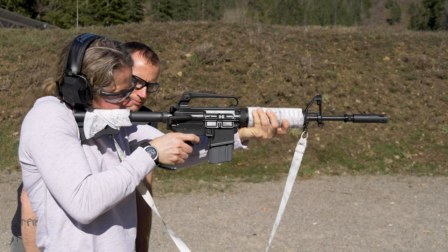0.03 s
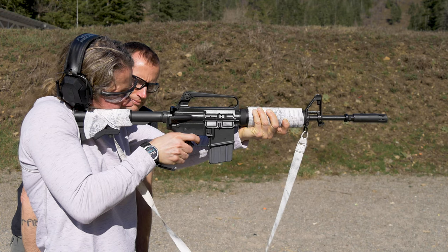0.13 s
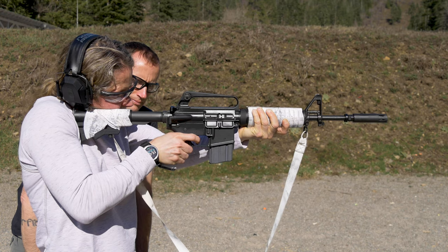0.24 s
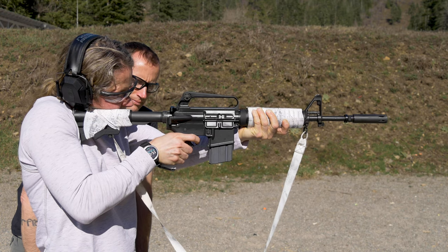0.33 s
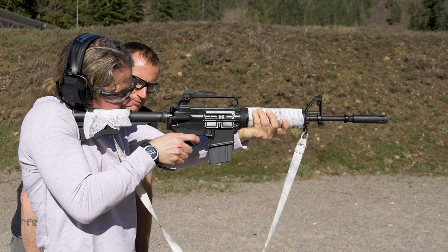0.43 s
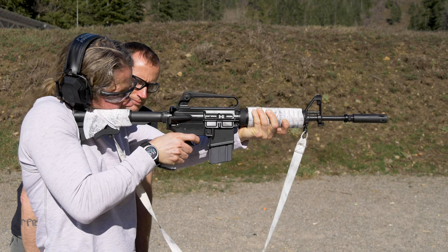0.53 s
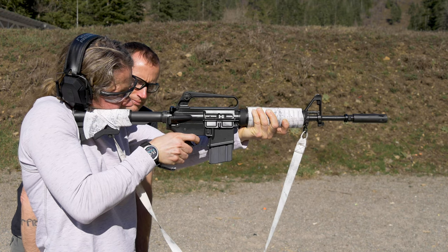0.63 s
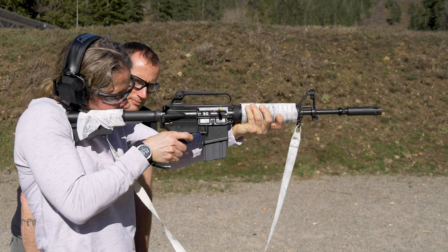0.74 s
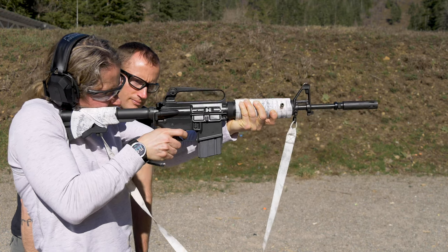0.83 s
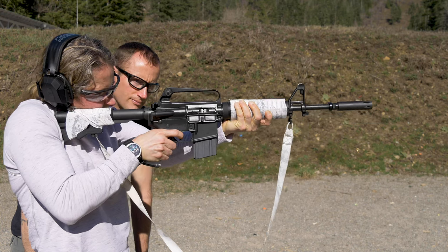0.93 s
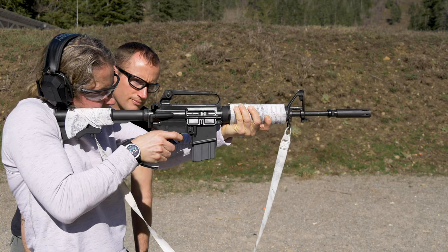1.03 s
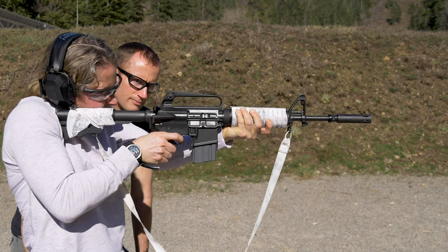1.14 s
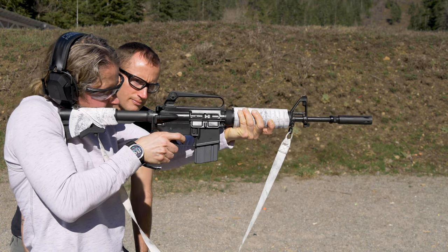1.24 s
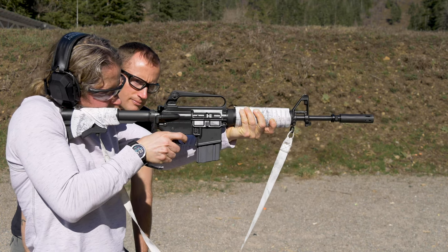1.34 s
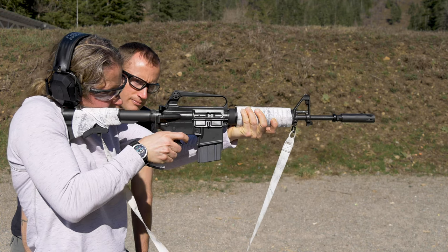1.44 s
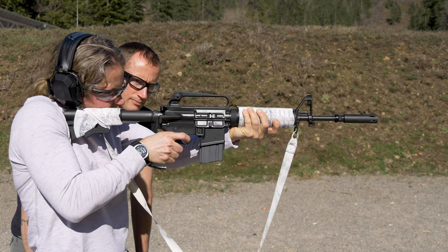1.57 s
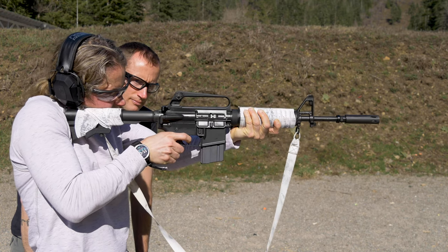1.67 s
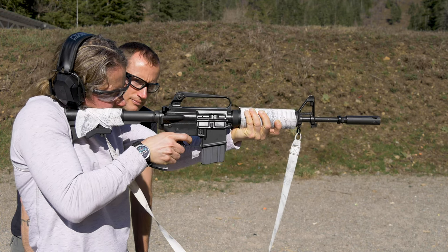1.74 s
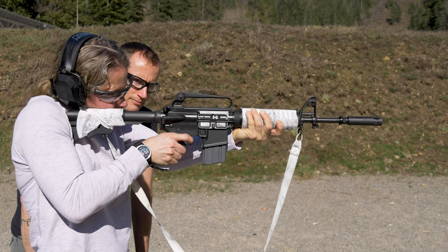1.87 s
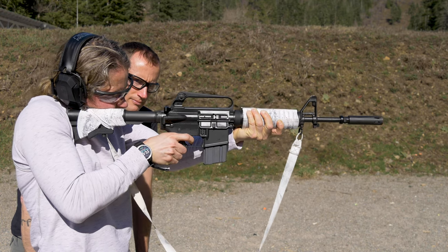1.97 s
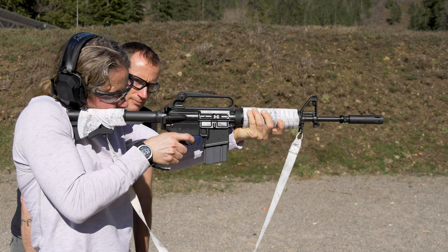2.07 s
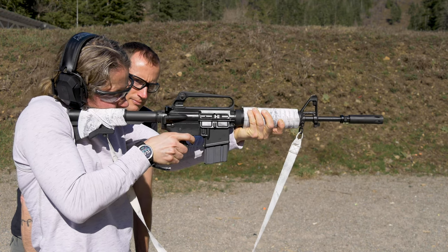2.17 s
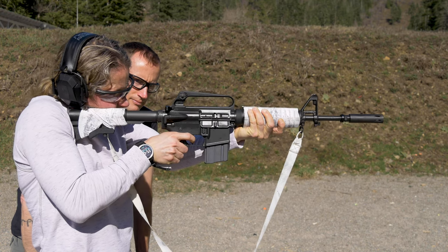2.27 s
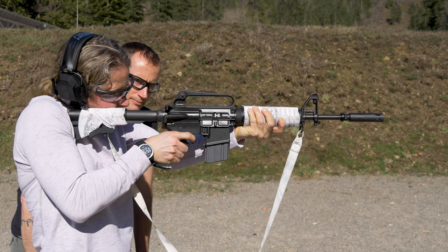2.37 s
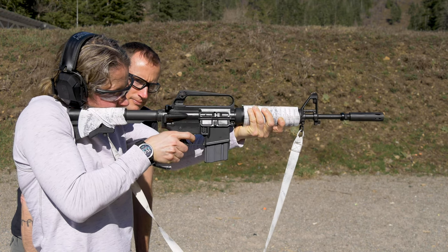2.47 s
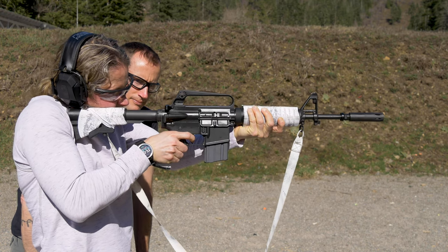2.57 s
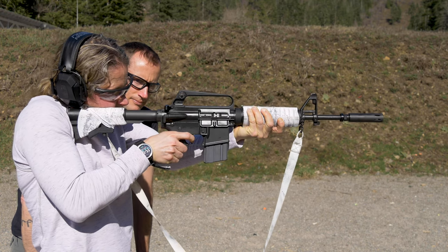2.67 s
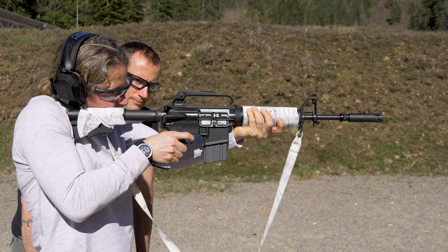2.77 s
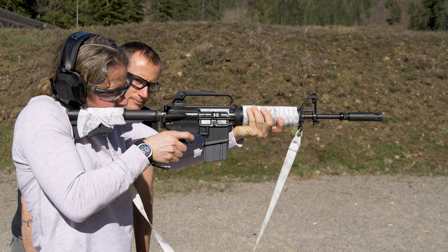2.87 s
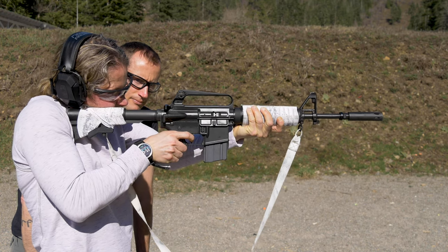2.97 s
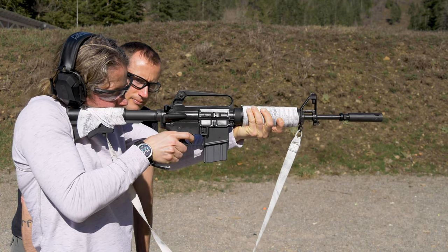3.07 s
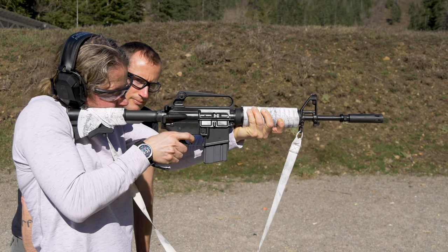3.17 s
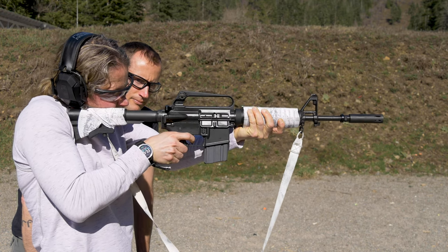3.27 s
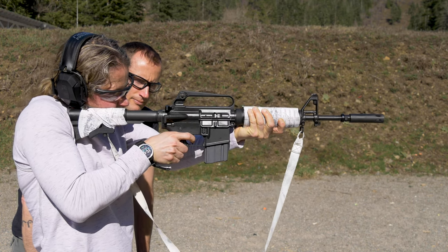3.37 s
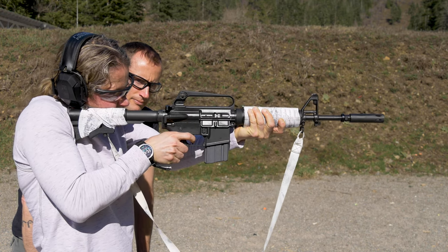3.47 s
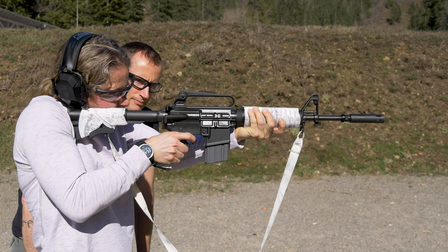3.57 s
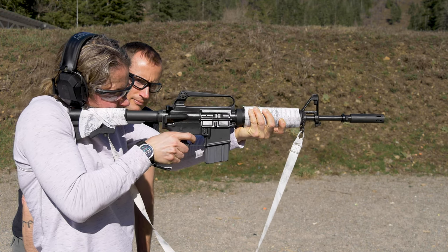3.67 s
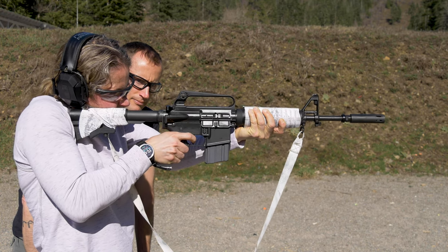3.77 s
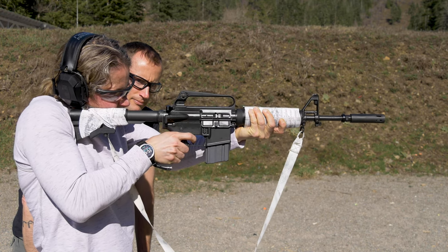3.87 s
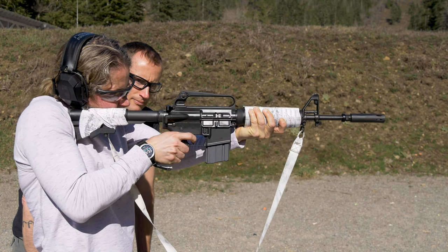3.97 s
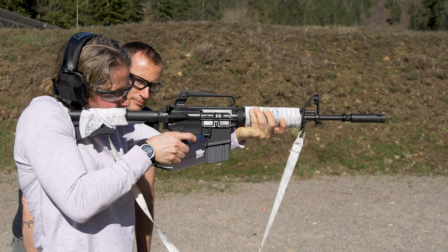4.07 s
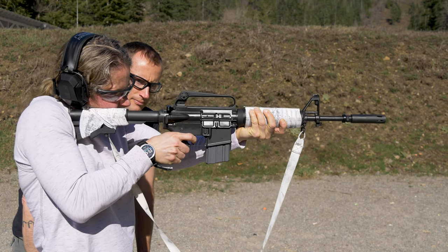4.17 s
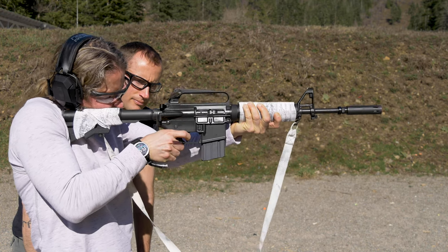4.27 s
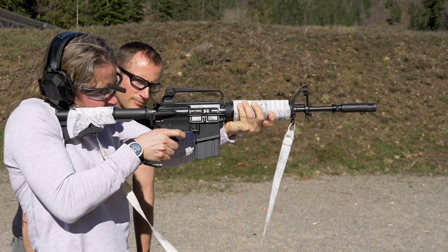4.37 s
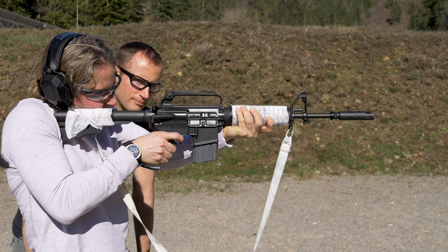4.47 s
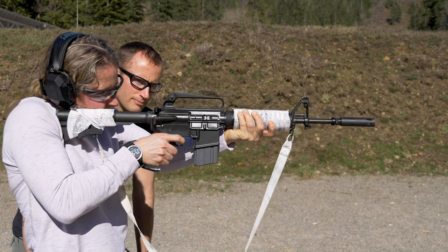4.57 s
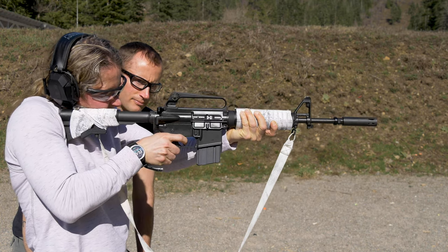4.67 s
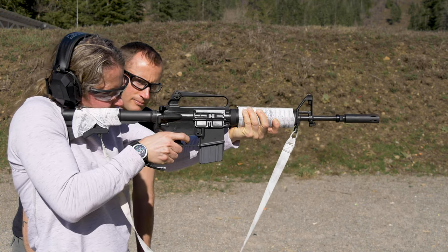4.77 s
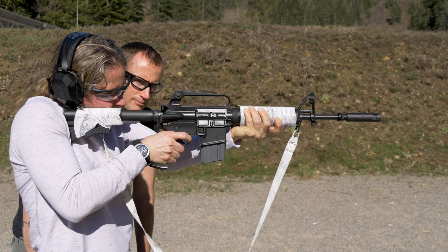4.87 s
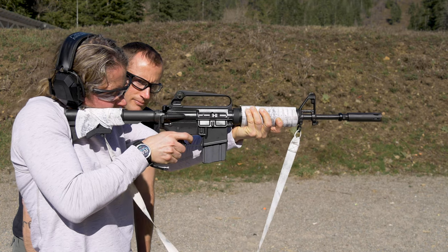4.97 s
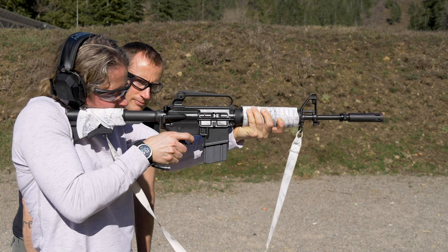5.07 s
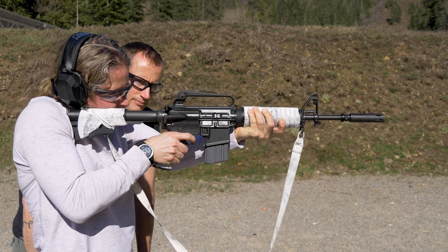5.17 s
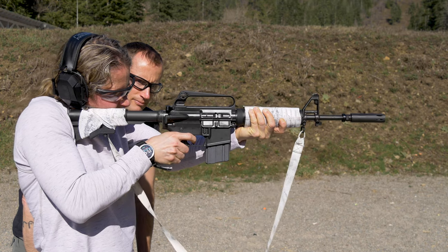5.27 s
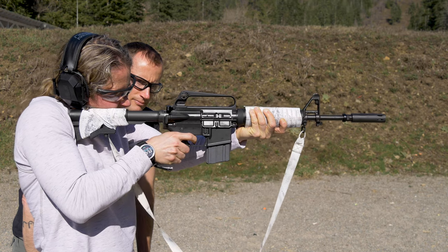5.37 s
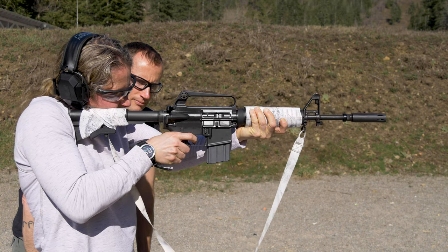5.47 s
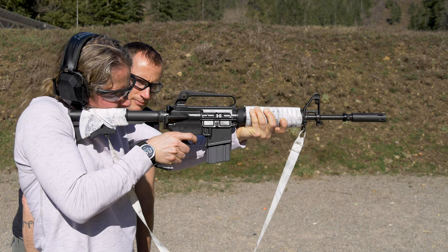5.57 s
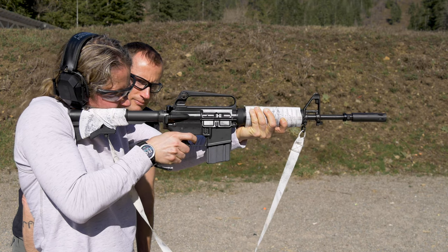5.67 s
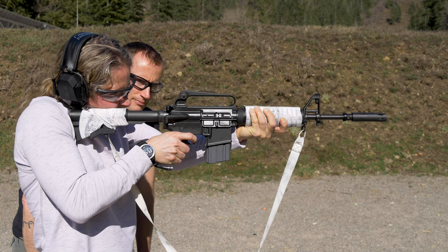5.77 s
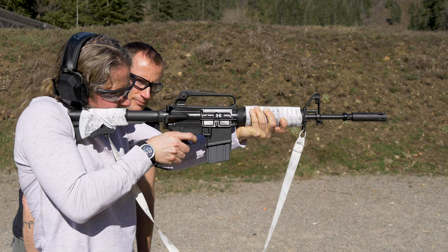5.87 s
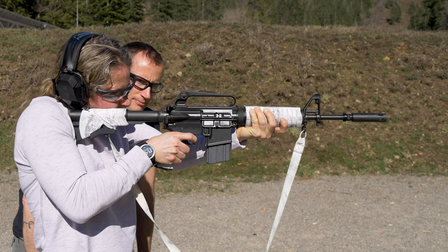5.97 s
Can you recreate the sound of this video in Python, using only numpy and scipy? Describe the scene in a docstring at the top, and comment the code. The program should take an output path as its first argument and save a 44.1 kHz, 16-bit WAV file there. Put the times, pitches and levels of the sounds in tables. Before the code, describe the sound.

Two sharp rifle shots crack close by at an outdoor range, echoing off the hills, with a faint distant gunshot between them.

```python
"""Two rifle shots on an outdoor range

The microphone stands beside the rifle: the hammer falls, the muzzle blast clips the input, the bolt
cycles, and berms and wooded slopes throw the bang back. Spent brass pings on the gravel. Between the
shots a far gun thumps behind a berm and rolls through the hills. A distant engine's exhaust, a low
drone, the hush of the woods and light wind on the microphone lie underneath."""
import sys
import numpy as np
from scipy import signal
from scipy.fft import rfft, irfft, next_fast_len
from scipy.io import wavfile
from scipy.ndimage import uniform_filter1d

SR = 44100
rng = np.random.default_rng(int(sys.argv[2]) if len(sys.argv) > 2 else 0)


def int16_out(signal):
    """Quantize to a 16-bit WAV file."""
    q = np.round(np.clip(np.atleast_2d(signal).T, -1, 1) * 32767)
    wavfile.write(sys.argv[1], SR, q.astype(np.int16))


N = 265041
T = np.arange(N) / SR
GROUND_LAG_S = 0.0018  # a bounce off the ground reaches the microphone this long after the direct path


def amp(db):
    """Decibels to gain, with a floor at -300 dB."""
    return 10 ** (np.maximum(db, -300) / 20)


def unit(x):
    """Scale to rms 1."""
    return x / np.sqrt(np.mean(x ** 2) + 1e-20)


def along(points, hz):
    """Read between (Hz, value) points on a log frequency axis."""
    knots_hz, values = np.transpose(points)
    return np.interp(np.log(hz + 1), np.log(knots_hz), values)


def later(x, s):
    """x delayed by s seconds and padded to the length of the scene."""
    return np.pad(x, (max(round(s * SR), 0), N))[:N]


def wobble(rate):
    """A slow random curve, rate knots a second."""
    return np.interp(T * rate, np.arange(1000), rng.standard_normal(1000))


def swell(peak_s, rise_db_per_s, fall_db_per_s):
    """A gain that climbs to 1 at peak_s and falls again, both evenly in dB."""
    slope = np.where(T < peak_s, rise_db_per_s, fall_db_per_s)
    return amp(-np.abs(slope * (T - peak_s)))


def swells(rows):
    """The joint gain of overlapping swells, added in power."""
    return np.linalg.norm([amp(db) * swell(s, rise, fall) for s, db, rise, fall in rows], axis=0)


def filtered(x, response):
    """x through a complex frequency response."""
    size = next_fast_len(N + SR // 2)
    return irfft(rfft(x, size) * response(np.fft.rfftfreq(size, 1 / SR)), size)[:N]


def noise(colour):
    """Noise of rms 1, its spectrum drawn through (Hz, dB) points."""
    return unit(filtered(rng.standard_normal(N), lambda hz: amp(along(colour, hz))))


def burst(colour, t60):
    """A short coloured noise that dies by 60 dB in t60 seconds."""
    t = T[:SR // 4]
    hz = np.fft.rfftfreq(len(t), 1 / SR)
    spectrum = rfft(rng.standard_normal(len(t))) * amp(along(colour, hz))
    return unit(irfft(spectrum, len(t))) * amp(-60 * t / t60)


def blast(length_s, edge_hz):
    """A pressure jump and the suction behind it; a lower edge_hz rounds the front, as distance does."""
    age = T[:SR // 8] / length_s
    rounding = signal.butter(3, min(edge_hz, SR / 3), fs=SR, output="sos")
    return later(signal.sosfilt(rounding, (1 - age) * np.exp(-age)), 0)


def off_ground(x, lag_s=0.001843, share=0.33, dull_hz=2800):
    """The ground adds a late, duller copy, which combs the spectrum."""
    return filtered(x, lambda hz: 1 + share * np.exp(-2j * np.pi * hz * lag_s) / (1 + (hz / dull_hz) ** 4))


def arrivals(rows, lags):
    """One blast for each path to the microphone, with its ground bounce lags seconds behind."""
    return sum(later(off_ground(amp(db) * blast(length_s, edge_hz), lag, share=0.49), s)
               for (s, db, length_s, edge_hz), lag in zip(rows, lags))


# What air and ground take from sound crossing the range. Each row: frequency in Hz, loss in dB a second.
PATH_LOSS = [(50, 32), (160, 15.5), (260, 0.5), (400, 2.5), (600, 5), (1000, 5), (2000, 10.5), (4000, 24),
             (8000, 69), (13000, 110)]


def travelled(x):
    """The later an echo arrives, the more treble and deep bass it has lost."""
    hz, t, spectra = signal.stft(x, SR, nperseg=1024)
    loss_db = np.abs(along(PATH_LOSS, hz))[:, None] * t
    return signal.istft(spectra * amp(-loss_db), SR, nperseg=1024)[1][:N]


# The microphone's noise floor. Each row: frequency in Hz, relative level in dB.
HISS_COLOUR = [(200, -1.5), (4000, 1.5), (7000, -0.5), (10500, -5.5), (13000, -12.5), (16000, -23.5)]


def microphone_hiss(db=-81):
    """The microphone's own faint, steady noise."""
    return amp(db) * noise(HISS_COLOUR)


# Open air, heard from far off. Each row: frequency in Hz, relative level in dB.
AIR_COLOUR = [(25, -12), (90, -5), (170, -2.5), (270, -6), (450, 0), (1100, -3), (2000, -12), (2900, -16),
              (4000, -26), (7000, -40), (16000, -70)]


def woods(db=-59, ease_db_per_s=1.5):
    """The hush of the woods around the range, slowly dying down."""
    return amp(db - ease_db_per_s * T) * noise(AIR_COLOUR)


# Gusts on the microphone. Each row: time of the peak in seconds, level in dB.
GUSTS = [(.07, -51.5), (1.801, -44.5)]


def wind(breeze_db=-59, ease_db_per_s=1.6):
    """A light, easing breeze rumbles on the microphone, and two gusts buffet it."""
    breeze = amp(breeze_db - ease_db_per_s * T)
    gusts = sum(amp(db) * swell(s, rise_db_per_s=75, fall_db_per_s=65) for s, db in GUSTS)
    rumble = noise([(12, -18.5), (30, -3.5), (60, 0.5), (130, -12), (400, -38), (2000, -100)])
    return (breeze + gusts) * rumble


def drone(db=-64, peak_s=3, hz_at_peak=121, sag_hz_per_s=7.3, wander_hz=2, waver=0.41):
    """A low, wavering tone comes up in the background while its pitch sinks."""
    hz = hz_at_peak - sag_hz_per_s * (T - peak_s) + wander_hz * wobble(14)
    tone = unit((1 + waver * wobble(6.6)) * np.sin(2 * np.pi * np.cumsum(hz) / SR))
    return amp(db) * swell(peak_s, rise_db_per_s=5, fall_db_per_s=0.9) * tone


# An exhaust far across the field. Each row: multiple of the firing rate, relative level in dB.
EXHAUST = [(1, -2), (2, -12.5), (3, -2.5), (4, -14.5), (5, -2), (6, -13.5), (7, -11.5), (8, 1.5), (9, 1),
           (10, -8), (11, -4), (12, -8), (13, -6)]


def engine(peak_db=-47.5, start_hz=41.4, rise_hz_per_s=5.8, unsteady=0.008, flutter=0.4, rush_db=-8):
    """A distant engine picks up speed in a rush of noise; each harmonic flutters on its way here."""
    firing_hz = (start_hz + rise_hz_per_s * T) * (1 + unsteady * wobble(25))
    phase = 2 * np.pi * np.cumsum(firing_hz) / SR
    overtones = [(k, -12) for k in range(len(EXHAUST) + 1, 2 * len(EXHAUST))]  # weak, all at -12 dB
    exhaust = sum(amp(db) * (1 + flutter * wobble(30)) * np.sin(k * phase + 2 * np.pi * rng.random())
                  for k, db in EXHAUST + overtones)
    level = amp(peak_db) * swell(peak_s=0.689, rise_db_per_s=7.5, fall_db_per_s=5)
    return level * (unit(exhaust) + amp(rush_db) * noise(AIR_COLOUR))


# The far gun's first arrivals, bent over a berm.
# Each row: delay in seconds, level in dB, pulse length in seconds, cutoff of the front in Hz.
FAR_THUMPS = [(0, -7.5, 0.0014, 770), (.002, -9, 0.0013, 298), (.0088, -14, .0022, 220),
              (.0335, -28, .0012, 500)]
# Its bright slaps. Each row: delay in seconds, level in dB.
FAR_SLAPS = [(.002, -51), (0.104, -41)]
# The hills that answer it. Each row: delay of the peak in seconds, level in dB, rise and fall in dB/s.
FAR_HILLS = [(.18, -32.5, 48, 13.5), (.68, -41, 9, 10)]
# Its roll through those hills. Each row: frequency in Hz, relative level in dB.
FAR_ROLL_COLOUR = [(30, -8.5), (100, -1), (200, -6), (400, -1), (650, 2), (1300, -1.5), (2600, -9),
                   (4200, -21.5), (8000, -26.5), (14000, -40.5)]


def far_gun(start_s=1.9422, boom_db=-28, boom_t60=0.5, roll_delay_s=0.027):
    """A thump and a short boom bend over a berm, then trees and hills answer more brightly."""
    paths = arrivals(FAR_THUMPS, [GROUND_LAG_S] * len(FAR_THUMPS))
    thump = off_ground(paths, lag_s=0.0017, share=0.31)
    dull = [(30, -3), (70, -4.5), (130, 0), (220, -19.5), (600, -7.5), (1000, -20), (3000, -59)]
    soft_front = 1 - np.exp(-T / 0.0017)
    boom = soft_front * amp(boom_db - 60 * T / boom_t60) * noise(dull)
    bright = [(800, -22), (2700, 5.5), (5000, -3), (8000, -10), (14000, -24)]
    slaps = sum(later(amp(db) * burst(bright, t60=0.051), s) for s, db in FAR_SLAPS)
    roll = travelled(noise(FAR_ROLL_COLOUR)) * swells(FAR_HILLS) * (T > roll_delay_s)
    return later(thump + boom + slaps + roll, start_s)


# Spent cases landing and bouncing nearby. Each row: start in seconds, click level in dB, ring level in dB.
CASE_LANDINGS = [(1.4726, -41.5, -37.5), (1.575, -68, -70), (5.0358, -54.5, -76)]
# The modes of a case. Each row: frequency in Hz, relative level in dB, seconds to fade by 60 dB.
BRASS_MODES = [(10800, 1, 0.088), (15060, -10, 0.15), (14890, -5, 0.058)]


def spent_cases():
    """Brass clicks on the gravel and rings."""
    t = T[:SR // 2]
    ring = sum(amp(db - 60 * t / t60) * np.sin(2 * np.pi * hz * t) for hz, db, t60 in BRASS_MODES)
    stone = [(2000, -28), (7500, -1), (11000, 5), (16000, -22)]
    return sum(later(amp(click_db) * burst(stone, t60=0.023), s) + later(amp(ring_db) * ring, s)
               for s, click_db, ring_db in CASE_LANDINGS)


def scatter(colour, grain_db=1.5):
    """The answer of countless trees and clods of uneven size, dulled by the way it has come."""
    sizes = amp(grain_db * unit(uniform_filter1d(rng.standard_normal(N), 128)))
    return travelled(unit(off_ground(sizes * noise(colour))))


# The echo off the wooded slopes, farthest out. Each row: frequency in Hz, relative level in dB.
SLOPE_COLOUR = [(40, -28.5), (70, -6), (160, -5), (240, -7), (310, 1), (400, 0), (560, 1), (800, -5.5),
                (1200, -5.5), (2200, -9), (4200, -16.5), (8000, -16), (12000, -12), (16000, -26.5)]


def wooded_slopes(db=-15.5, peak_s=0.29, spread_db_per_doubling=11):
    """The slopes answer the rifle last, then fade as the path of the sound grows."""
    doublings = np.log2(np.maximum(T / peak_s, 1))
    onset = swell(peak_s, rise_db_per_s=330.5, fall_db_per_s=0)
    return amp(db - spread_db_per_doubling * doublings) * onset * scatter(SLOPE_COLOUR)


# Banks in the middle distance. Each row: delay of the peak in seconds, level in dB, rise and fall in dB/s.
BANKS = [(.106, -15, 50, 260), (.219, -8, 259.5, 238)]
# Their echo. Each row: frequency in Hz, relative level in dB.
BANK_COLOUR = [(40, -17), (70, -5), (160, -7.5), (270, 6), (400, -3.5), (580, 2.5), (800, -7), (1200, -6),
               (2200, -9), (4200, -17.5), (8000, -15.5), (16000, -22.5)]


def earth_banks():
    """Each broad bank returns the bang as a swell of scatter."""
    return swells(BANKS) * scatter(BANK_COLOUR)


# Scatter from close around the microphone. Each row: frequency in Hz, relative level in dB.
NEAR_COLOUR = [(25, -23), (42, -21), (75, -5.5), (130, -11.5), (180, -4), (420, -2), (600, 3), (1200, -8),
               (2200, -10), (4500, -20.5), (9000, -20.5), (16000, -32)]


def firing_point(db=5.5, edge_s=0.064, release_db_per_s=950):
    """Scatter off the shooters and the gravel builds up, sags, and stops at the edge of the range."""
    level = amp(db) * swell(peak_s=0.012, rise_db_per_s=899.5, fall_db_per_s=84)
    release = amp(-release_db_per_s * np.maximum(T - edge_s, 0))
    return level * release * noise(NEAR_COLOUR)


def landscape():
    """One bang as the surroundings return it, nearest first."""
    return firing_point() + earth_banks() + wooded_slopes()


# The shots beside the microphone. Each row: start in seconds, gain of the bang in dB,
# seconds until the bolt hits its rear stop, seconds until it slams home.
SHOTS = [(0.8084, 1.5, .0528, .165), (4.3033, 1, .0593, .162)]
# The bolt at its rear stop. Each row: seconds after the hit, level in dB.
BOLT_RATTLE = [(0, 7), (.01, -4.5), (.038, -27), (0.056, -32)]
# A blow in the rifle's action, heard close up. Each row: frequency in Hz, relative level in dB.
ACTION_COLOUR = [(300, -20.5), (1500, -6.5), (3000, -5), (5800, 4), (7500, -12), (10500, -10.5),
                 (15000, -11)]


def rifle_action(hammer_lead_s=0.007, hammer_db=-16.5, breech_db=3.5, home_db=-20.5):
    """The hammer falls, the breech takes the shock, and the bolt flies back, rattles and slams home."""
    blows = []  # start in seconds, level in dB, seconds to fade by 60 dB
    for s, _, back_s, home_s in SHOTS:
        blows.append((s - hammer_lead_s, hammer_db, 0.012))
        blows.append((s, breech_db, 0.012))
        blows.append((s + home_s, home_db, 0.029))
        blows += [(s + back_s + lag, db, 0.037) for lag, db in BOLT_RATTLE]
    return sum(later(amp(db) * burst(ACTION_COLOUR, t60), s) for s, db, t60 in blows)


# Single echoes off berms and walls.
# Each row: seconds after the shot, level in dB, pulse length in seconds, cutoff of the front in Hz.
WALL_ECHOES = [(0.0637, 14.5, .0011, 600), (0.0706, 18, .0012, 550), (0.0759, 12, .0012, 550),
               (.0825, 8.5, .0011, 550), (0.0995, 10, 0.00037, 2700), (0.167, 2, .0005, 900),
               (.2142, 2, .0006, 1800), (.227, -1, 0.00074, 1095), (0.239, 4.5, 0.00046, 1090),
               (0.271, -0.5, 0.00028, 1200)]


def rifle_shots(muzzle_db=11, alike=0.88, wall_cut_hz=200, ring_hz=12770, ring_db=-44, ring_t60=0.85):
    """Two muzzle blasts meet the same surroundings, so their echoes are nearly alike."""
    muzzle = amp(muzzle_db) * blast(length_s=0.0016, edge_hz=9500)
    # steep paths from close walls put the ground bounce a millisecond further behind
    lags = [GROUND_LAG_S + 0.001 * (s < 0.09) for s, *_ in WALL_ECHOES]
    # waves longer than a reflector is tall pass it by
    bass_cut = signal.butter(2, wall_cut_hz, "highpass", fs=SR, output="sos")
    walls = signal.sosfilt(bass_cut, arrivals(WALL_ECHOES, lags))
    steel_ring = amp(ring_db - 60 * T / ring_t60) * np.sin(2 * np.pi * ring_hz * T)
    common = muzzle + walls + steel_ring + np.sqrt(alike) * landscape()
    return sum(amp(db) * later(common + np.sqrt(1 - alike) * landscape(), s) for s, db, *_ in SHOTS)


def scene():
    """The whole range at one microphone beside the rifle."""
    shooting = rifle_shots() + rifle_action() + spent_cases() + far_gun()
    background = engine() + drone() + wind() + woods() + microphone_hiss()
    return (shooting + background)[None]


def record(dry, low_cut_hz=38, ceiling=0.82, top_hz=16000):
    """The microphone drops the deepest bass, the input clips hard, and the band ends at top_hz."""
    low_cut = signal.butter(2, low_cut_hz, "highpass", fs=SR, output="sos")
    clipped = np.clip(signal.sosfilt(low_cut, dry[0]), -ceiling, ceiling)
    band_limit = signal.butter(16, top_hz, fs=SR, output="sos")
    return signal.sosfiltfilt(band_limit, clipped)[None]


dry = scene()
out = record(dry)
int16_out(out)
```